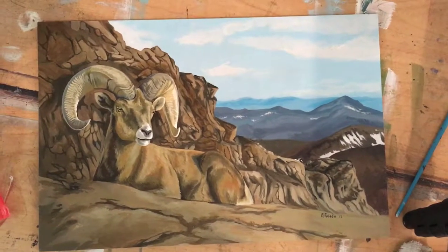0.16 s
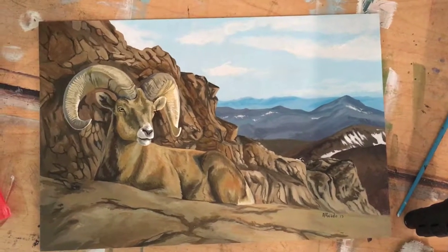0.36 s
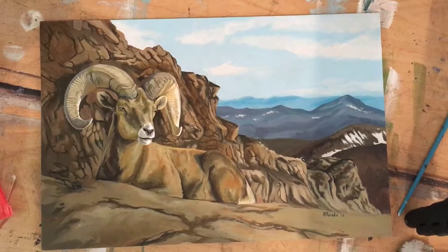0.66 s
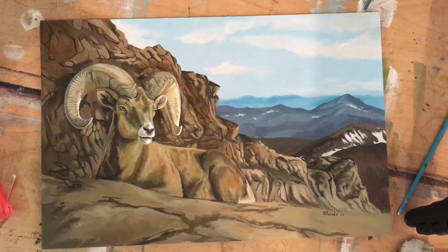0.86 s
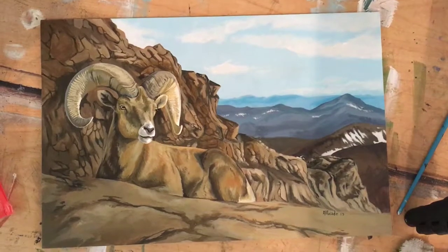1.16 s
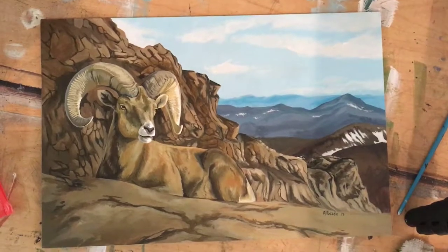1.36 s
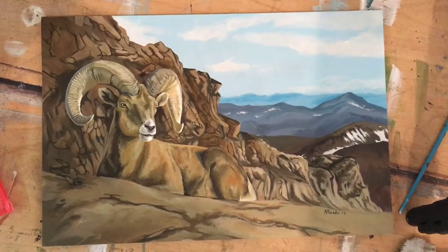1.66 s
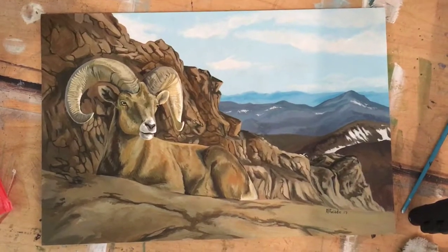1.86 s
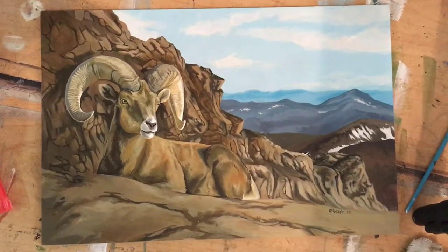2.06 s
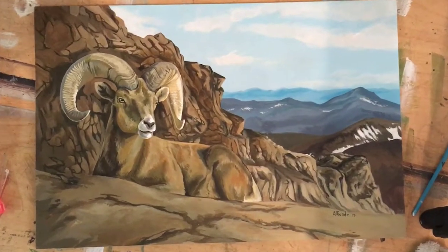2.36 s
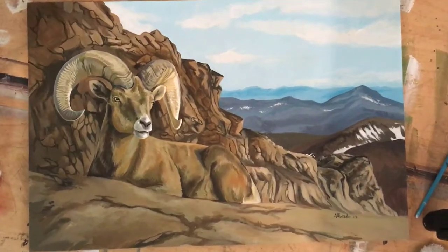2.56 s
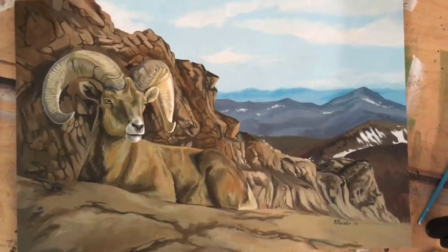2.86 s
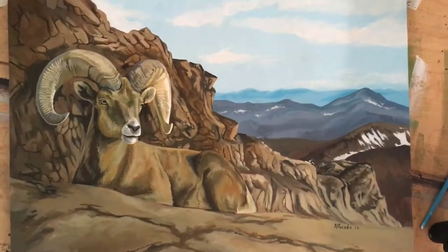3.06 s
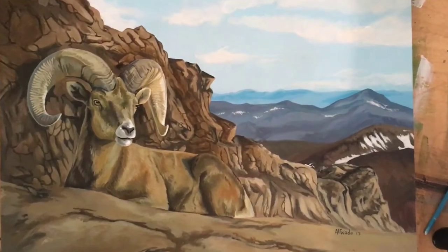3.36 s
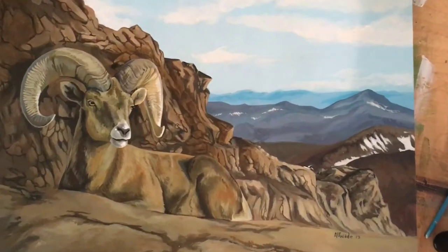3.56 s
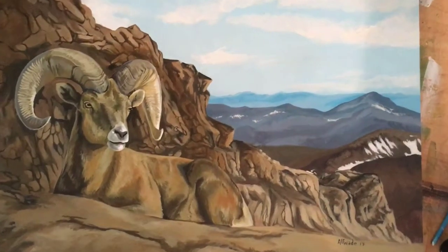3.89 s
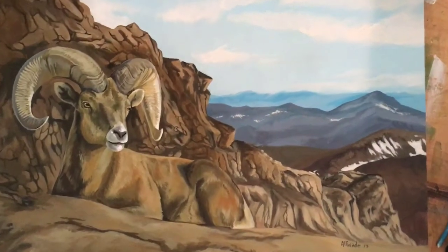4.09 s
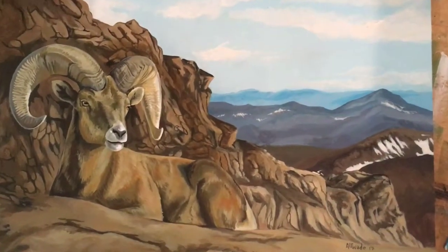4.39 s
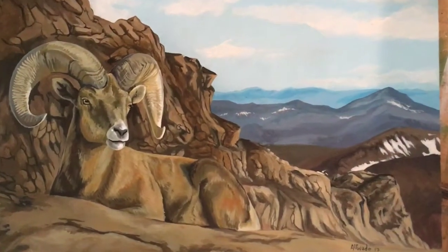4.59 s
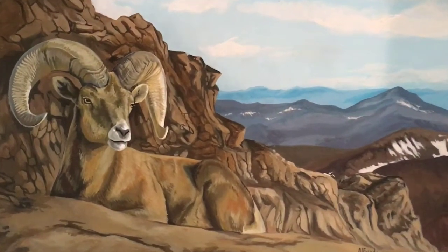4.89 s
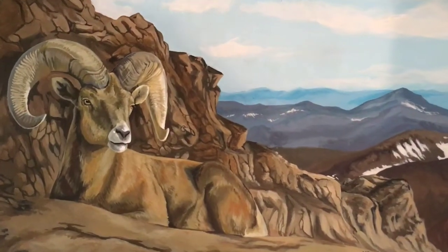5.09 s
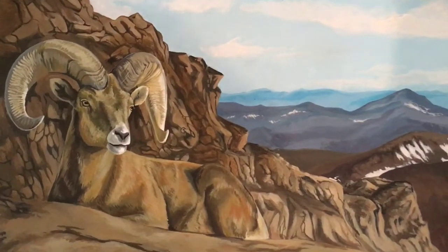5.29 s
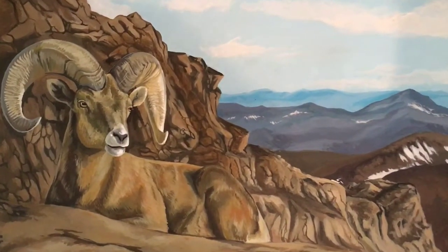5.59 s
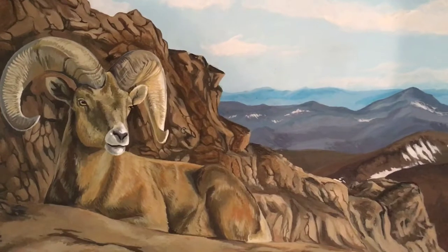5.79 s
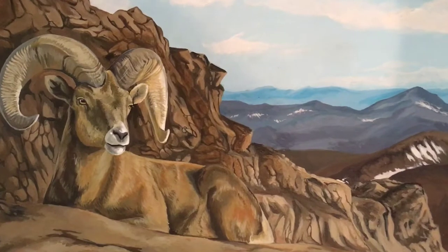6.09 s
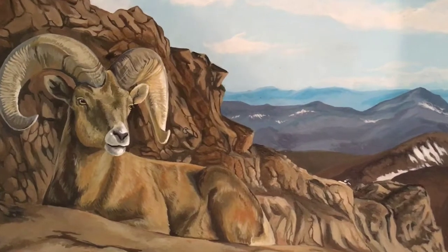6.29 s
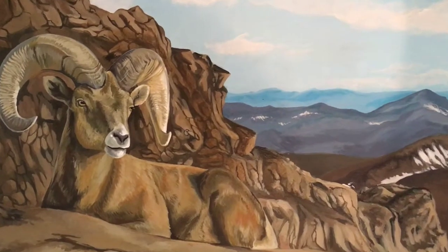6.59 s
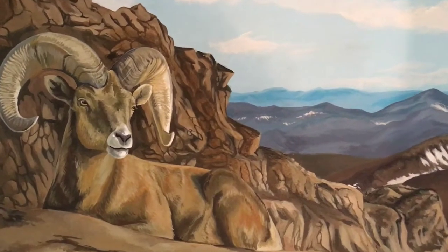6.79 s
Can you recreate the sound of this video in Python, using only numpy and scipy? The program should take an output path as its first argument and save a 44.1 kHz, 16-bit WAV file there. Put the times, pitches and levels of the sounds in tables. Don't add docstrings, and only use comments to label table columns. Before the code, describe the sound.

Deep electrical-sounding drone from a distant unseen motor, sagging slightly once midway, while a small object taps and the floor creaks very faintly.

```python
import sys
import numpy as np
from scipy import signal
from scipy.fft import rfft, irfft
from scipy.io import wavfile
from scipy.ndimage import map_coordinates

SR = 44100
rng = np.random.default_rng(int(sys.argv[2]) if len(sys.argv) > 2 else 0)


def how_loud(loudness_db):
    steps = np.asarray(loudness_db, float) / 20
    return 10 ** steps


def to_wav(s):
    ch = np.atleast_2d(s).T
    pcm = np.round(np.clip(ch, -1, 1) * 32767)
    wavfile.write(sys.argv[1], SR, pcm.astype(np.int16))


N = 306432

# (frequency [Hz], level [dB per Hz])
AIR_SPECTRUM = [(300, -125), (500, -110), (600, -107), (740, -114), (850, -111), (1440, -115), (1870, -110),
                (2300, -115), (2900, -120), (4600, -123), (4900, -127), (5500, -125), (7100, -125),
                (7400, -129)]
# (frequency [Hz], level [dB per Hz])
HISS_SPECTRUM = [(7400, -129), (8000, -129), (8500, -125), (9800, -125), (10400, -131), (11700, -128),
                 (13000, -129), (14000, -128.5), (15740, -130)]
# (frequency [Hz], level [dB per Hz])
RUMBLE_SPECTRUM = [(12, -100), (25, -93), (40, -84.5), (66, -78.5), (90, -86.5), (125, -74), (140, -77.5),
                   (160, -89.5), (190, -91.5), (225, -101), (290, -99), (390, -99.5), (450, -106),
                   (560, -120)]

# (frequency [Hz], level [dB])
MAINS_TONES = [(60, -73), (240, -82)]
# (frequency [Hz], level [dB])
WEAK_BUZZ = [(3000, -122), (3400, -111), (8000, -113), (12000, -113), (13000, -119), (14200, -117),
             (15700, -116)]
STRONG_BUZZ_MULTIPLES = [61, 63, 65, 67, 68, 78, 93, 93, 94, 114, 118, 119, 138, 139, 142, 143, 143, 145,
                         146, 148, 157, 159, 161, 189, 193, 195, 196, 197, 197, 197]
# (peak level [dB], loudest at [s], duration [s])
STRONG_BUZZ = [(-104, 1, 2.7), (-101, 5, 2), (-102, 4.1, 1.2), (-100, 3.8, 1.1), (-104, 2.9, 3.2),
               (-104, 1.4, 1.8), (-98, 1.0, 0.65), (-99, 5.1, .45), (-103, 5.4, 3), (-95.5, 3.4, 1.1),
               (-94, 3.05, .35), (-102, 2.5, 3.9), (-102, 1.9, 3.5), (-102, 3.8, .7), (-102, 5.4, 1.8),
               (-102, 1.7, 1.4), (-103, 5.1, 1.3), (-100, 1.6, 3), (-99, 1.1, 1.8), (-102, 4.5, 0.52),
               (-101, 1.7, 1.5), (-103, 3.6, 1.1), (-99, 5, 2.1), (-103, 1.1, 3.9), (-100, 1.8, 1.8),
               (-101, 2.1, 1.6), (-101, 3.1, 0.77), (-94.5, 3.62, 0.2), (-102, 1.8, 3.4), (-96, 6.9, .2)]

# (time [s], duration [s], frequency [Hz], width [Hz], level [dB])
CREAKS = [(2.78, 0.033, 1600, 25, -84), (2.89, .03, 1580, 25, -80), (3.16, .05, 1590, 30, -90),
          (3.173, 0.07, 1290, 24.8, -87), (3.367, 0.052, 1546, 25, -80.5), (3.424, 0.049, 1290, 40, -86),
          (3.49, 0.034, 1790, 30, -85), (3.047, 0.018, 3500, 500, -86), (3.145, 0.048, 3220, 300, -87.5),
          (3.68, .02, 4000, 500, -93), (4.549, .015, 1750, 400, -79), (4.685, 0.07, 1700, 120, -83),
          (5.077, 0.073, 3500, 700, -89)]
# (time [s], peak level [dB])
TAPS = [
    (1.866, -73),
    (1.873, -66),
    (1.880, -55.5),
    (1.888, -59),
    (1.896, -58),
    (1.921, -69),
    (1.935, -61),
]
# (frequency [Hz], level [dB], 60 dB decay time [s])
TAP_MODES = [(333, -4.5, .035), (450, 0.5, 0.028), (537, -4, 0.014), (610, -6, 0.024), (930, -13, .02),
             (1200, -11, .025), (1960, -11.5, .02), (2400, -16, .015), (3500, -21, .015)]

MOTOR_ORDERS = [1.5, 2, 3, 4, 5, 6, 6.5, 7, 7.857, 9, 11, 12, 15, 15.714, 36, 37, 45, 46, 50, 53, 57, 58,
                61, 67.5, 69, 75, 84, 100]
MOTOR_ORDER_DB = [-30.5, -25, 0, -43, -34, -9.5, -35.5, -42, -29, -35.5, -46, -55.5, -52.5, -48.5, -59, -53,
                  -58, -61, -57.5, -61, -59.5, -63, -61.5, -63, -61.5, -58, -60, -60]
ORDER_SWAY_DB = {1.5: 1.2, 2: 2.1, 3: .15, 6: .4, 7.857: 1.5, 9: 1.8}
ORDER_LAG_RAD = {2: 1.0, 3: 0.0, 6: -2.9, 9: -2.0}
# (time [s], level [dB], duration [s])
OCTAVE_SWELLS = [(.12, -2.5, 0.054), (.28, 1.5, 0.043), (1.39, -4.5, 0.022), (2.475, -1.5, 0.032),
                 (3.303, -2.5, 0.14), (3.668, 3.0, 0.063), (4.224, -1, .04), (4.43, 2.2, 0.072),
                 (5.45, 1.5, 0.11), (6.222, 2.5, 0.11), (6.55, -3, 0.021)]
# (frequency [Hz], level [dB per Hz])
CLATTER_SPECTRUM = [(300, -32.5), (700, 0.5), (1100, 0), (1900, -5.5), (2500, -5), (3300, -32)]

MAINS_HZ = 60.012
SPEED_TURNS_PER_S, SAG_TURNS_PER_S = 22.198, 0.86
LOAD_PEAK_S, LOAD_ON_S, LOAD_OFF_S = 3.3, 0.27, 0.218
HUM_OFF_S = 0.17
HUM_DB, HUM_FADE_DB_PER_S, HUM_LOAD_DB = -37.5, -0.2056, -2.5


def at_hz(points, hz):
    table = np.array(points)
    log_hz = np.log(np.maximum(hz, 1))
    return np.interp(log_hz, np.log(table[:, 0]), table[:, 1], left=-200, right=-200)


def drift(rate_hz):
    pole = np.exp(-200 * np.pi * rate_hz / SR)
    white = rng.standard_normal(N // 100 + 1002)
    slow = signal.lfilter([1], [1, -2 * pole, pole * pole], white)[1000:]
    return np.interp(np.arange(N) / 100, np.arange(len(slow)), slow / slow.std())


def coloured(spectrum):
    hz = np.arange(N // 2 + 1) * SR / N
    white = rfft(rng.standard_normal(N))
    return irfft(white * how_loud(at_hz(spectrum, hz)) * np.sqrt(SR / 2), N)


def looped(line_db, cycles, sway_db, memory, count):
    size = 8192
    phases = np.exp(2j * np.pi * rng.random(line_db.shape[-1]))
    memory = np.clip(memory, 0, 0.95)
    chance = rng.standard_normal((count + 9, len(phases)))
    sway = signal.lfilter([np.sqrt(1 - memory ** 2)], [1, -memory], chance, axis=0)[9:]
    waves = irfft(how_loud(line_db + sway_db * sway) * phases * size / np.sqrt(2), size)
    waves = np.hstack([waves, waves[:, :1]])
    return map_coordinates(waves, [np.linspace(0, count - 1, N), cycles % 1 * size], order=1)


def load(off_s=LOAD_OFF_S):
    since = np.arange(N) / SR - LOAD_PEAK_S
    return np.exp(-0.5 * (since / np.where(since < 0, LOAD_ON_S, off_s)) ** 2)


def air():
    level_db = 0.3 * load() + 0.5 * drift(28.0)
    return how_loud(level_db) * (coloured(AIR_SPECTRUM) + coloured(HISS_SPECTRUM))


def rumble():
    return how_loud(1.1 * drift(4.2)) * coloured(RUMBLE_SPECTRUM)


def mains():
    t, moments = np.arange(N) / SR, np.linspace(0, N / SR, 24)
    multiples = np.arange(263)
    uneven_db = 3.5 * np.clip(rng.standard_normal(263), -2, 1)
    weak_db = at_hz(WEAK_BUZZ, multiples * MAINS_HZ) + uneven_db

    strong = np.full((24, 263), 1e-20)
    for multiple, (peak_db, s, lasts) in zip(STRONG_BUZZ_MULTIPLES, STRONG_BUZZ):
        nearness = np.exp(-0.5 * ((moments - s) / lasts) ** 2)
        strong[:, multiple] += how_loud(peak_db - 13 * (1 - nearness)) ** 2
    skirt = sum(np.roll(strong, step, axis=1) for step in (-2, -1, 0, 2))
    strong += how_loud(-11.5) ** 2 * skirt

    out = looped(weak_db, MAINS_HZ * t, sway_db=1.5, memory=0.49, count=12)
    out += looped(10 * np.log10(strong), MAINS_HZ * t, sway_db=2.5, memory=0.34, count=24)
    for hz, level_db in MAINS_TONES:
        out += np.sqrt(2) * how_loud(level_db + 1.5 * drift(3.9)) * np.sin(2 * np.pi * hz * t)
    return out


def creaks():
    t, white, out = np.arange(N) / SR, rng.standard_normal(N), np.zeros(N)
    for s, lasts, hz, width, level_db in CREAKS:
        pole = np.exp(-np.pi * width / SR)
        span = slice(int((s - 0.3) * SR), int((s + 0.3) * SR))
        resonance = [1, -2 * pole * np.cos(2 * np.pi * hz / SR), pole * pole]
        tone = signal.lfilter([1, 0, -1], resonance, white[span])
        swell = np.exp(-0.5 * ((t[span] - s) / lasts) ** 2)
        even_out = np.sqrt(np.sum(swell ** 2) / np.sum((swell * tone) ** 2))
        out[span] += how_loud(level_db) * swell * tone * even_out
    return out


def knock():
    clicks, out = np.zeros(N), np.zeros(N)
    for s, peak_db in TAPS:
        clicks[round(s * SR)] = how_loud(peak_db)
    for k, (hz, level_db, t60) in enumerate(TAP_MODES):
        pole, w = how_loud(-60 / (t60 * SR)), 2 * np.pi * hz / SR
        resonance = [1, -2 * pole * np.cos(w), pole * pole]
        ring = signal.lfilter([0, np.sin(w)], resonance, clicks + 1e-18)
        out -= (-1) ** k * how_loud(level_db) * ring
    return out


def octave_level():
    t = np.arange(N) / SR
    level_db = 0.45 * drift(5.0)
    for s, db, lasts in OCTAVE_SWELLS:
        level_db += db * np.exp(-0.5 * ((t - s) / lasts) ** 2)
    return level_db


def motor():
    sag = SAG_TURNS_PER_S * load()
    speed = SPEED_TURNS_PER_S - sag
    turns = np.cumsum(speed) / SR
    angle = 2 * np.pi * turns + 0.8 / 3
    from_middle_s = (np.arange(N) - N / 2) / SR
    hum_db = HUM_LOAD_DB * load(HUM_OFF_S) + HUM_FADE_DB_PER_S * from_middle_s
    moving_db = {3: hum_db, 6: octave_level()}

    tones = np.zeros(N)
    for order, level_db in zip(MOTOR_ORDERS, MOTOR_ORDER_DB):
        sway_db = ORDER_SWAY_DB.get(order, 2.2) * drift(6.7)
        lag = ORDER_LAG_RAD.get(order, 2 * np.pi * rng.random())
        if order == 6:
            lag = lag + 1.1 * sag
        tones += how_loud(level_db + moving_db.get(order, 0) + sway_db) * np.cos(order * angle + lag)

    half_orders_hz = np.arange(320) * np.median(speed) / 2
    uneven_db = 3.8 * np.clip(rng.standard_normal(320), -2, 1)
    line_db = at_hz(CLATTER_SPECTRUM, half_orders_hz) - 84 - 23.5 + uneven_db
    clatter = looped(line_db, turns / 2, sway_db=5.0, memory=0.45, count=14)
    return np.sqrt(2) * how_loud(HUM_DB) * tones + clatter


def scene():
    return (air() + rumble() + mains() + creaks() + knock() + motor())[None]


def top_cut(x):
    return signal.sosfilt(signal.butter(12, 16040, fs=SR, output="sos"), x)


def record(dry):
    return top_cut(dry)


dry = scene()
out = record(dry)
to_wav(out)
```